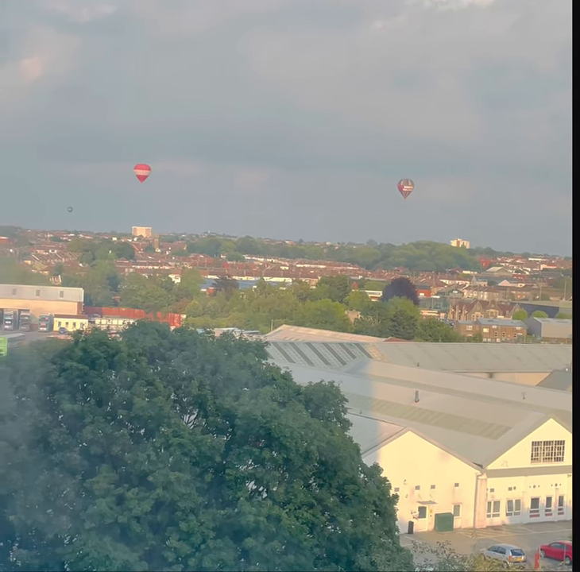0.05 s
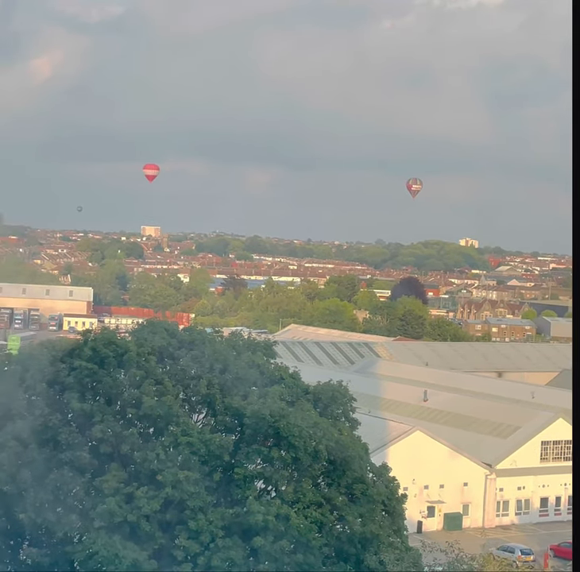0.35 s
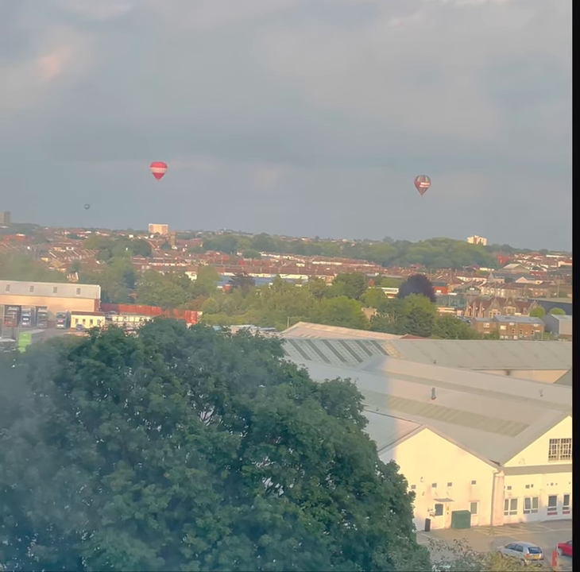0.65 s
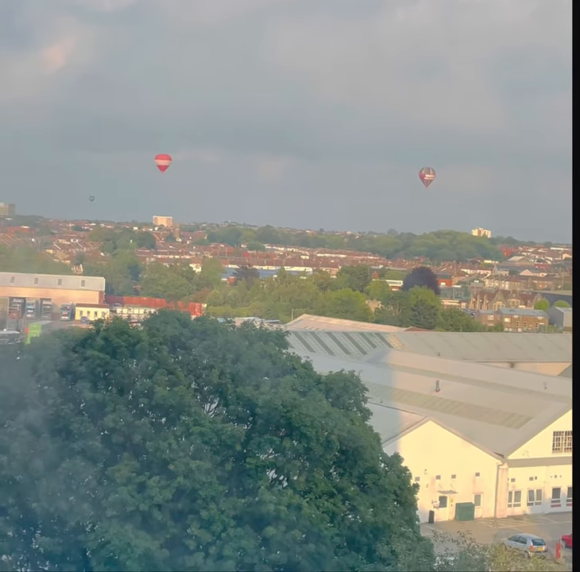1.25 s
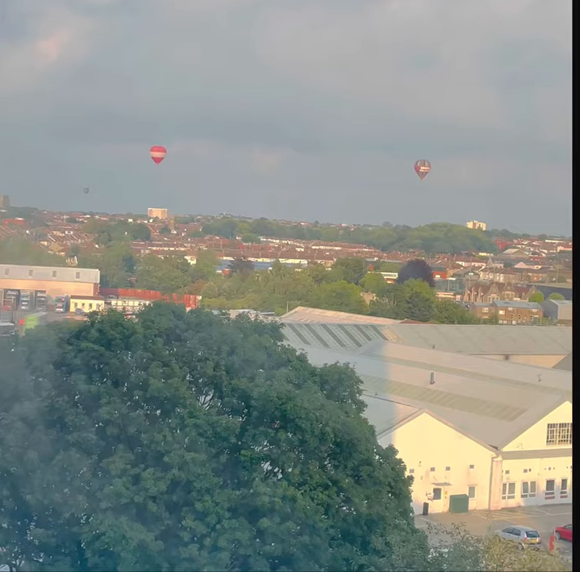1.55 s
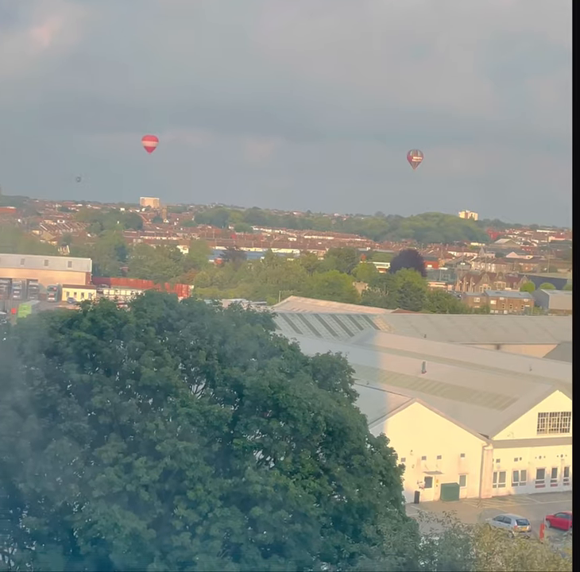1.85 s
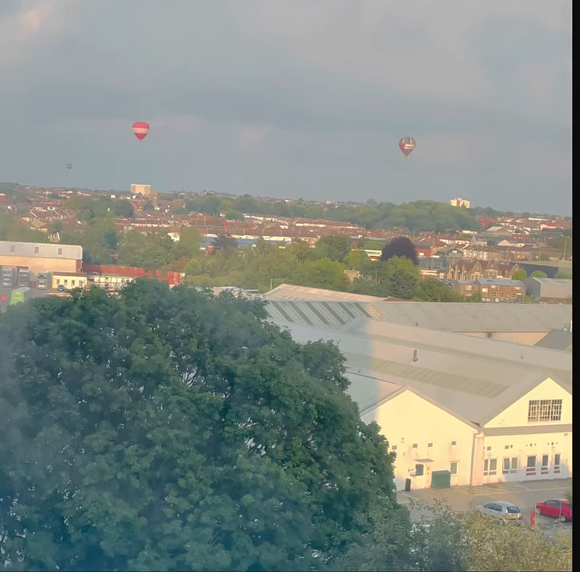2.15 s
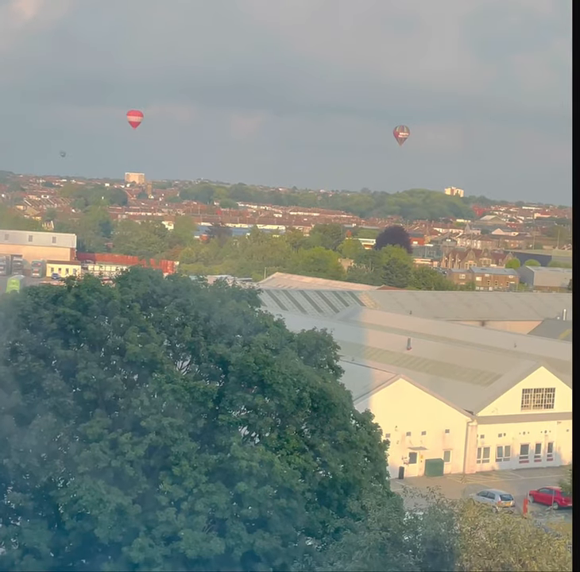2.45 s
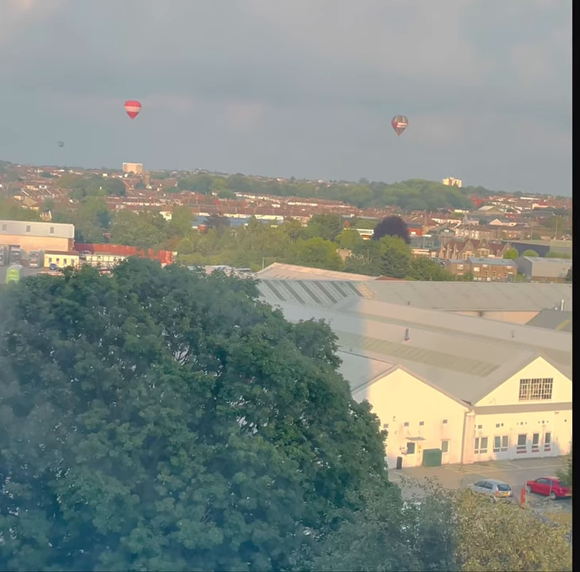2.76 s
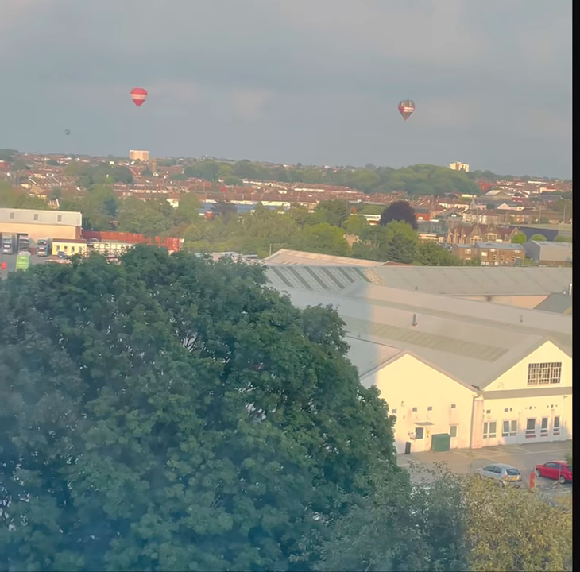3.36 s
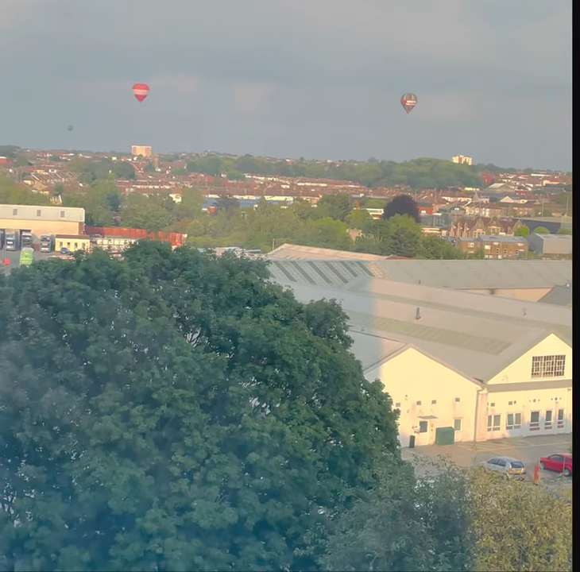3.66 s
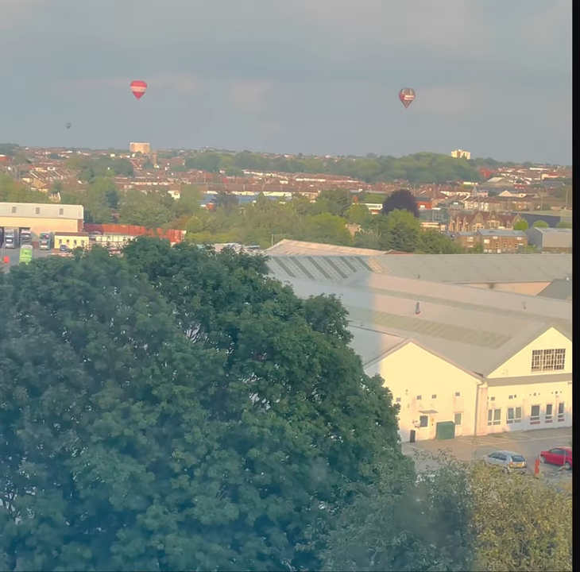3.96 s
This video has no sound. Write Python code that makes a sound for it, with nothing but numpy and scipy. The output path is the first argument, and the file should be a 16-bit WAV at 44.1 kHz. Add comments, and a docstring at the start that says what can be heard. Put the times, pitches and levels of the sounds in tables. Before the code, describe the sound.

Distant town traffic washes steadily throughout, over a deep, wavering rumble and faint engine drones. Soft, dull handling thuds and knocks hit the microphone often in the first 1.2 seconds, then only now and then. A far horn toots briefly at about 2.5 seconds, and a rougher toot follows near 3 seconds. Around 3.6 to 3.8 seconds a finger faintly brushes the microphone and ticks twice.

```python
"""Town from a high window

Far traffic washes steadily over a deep rumble and a few faint engine drones. A far horn toots, and a
brief, rougher toot follows near three seconds. A wall close by reflects the traffic, and a thin hiss
comes and goes. The hand that holds the microphone bumps it softly and knocks on its casing; near the
end a finger brushes it and ticks twice."""
import sys
import numpy as np
from scipy import signal
from scipy.fft import rfft, irfft
from scipy.io import wavfile

SR = 44100
rng = np.random.default_rng(int(sys.argv[2]) if len(sys.argv) > 2 else 0)


def wav_record(signal):
    """Record a signal, one row per channel, as 16-bit PCM in the file named by sys.argv[1]."""
    frames = np.transpose(np.atleast_2d(signal))
    bounded = np.clip(frames, -1, 1)
    # unit amplitude maps onto the largest positive 16-bit level
    quanta = np.round(bounded * 32767).astype(np.int16)
    wavfile.write(sys.argv[1], SR, quanta)


N = 176400
SIDES = np.array([[.5], [-.5]])   # splits a level or phase difference between left and right


def traffic():
    """Tyre and engine noise of many far streets, with one reflection from a wall close by."""
    # Spectra common to both channels and differing. Each row: frequency in Hz, relative level in dB.
    mid_spectrum = [(20, -35.5), (40, -10.5), (70, -0.5), (100, -7.5), (150, -8), (260, -13), (400, -18.5),
                    (520, -17), (700, -20), (850, -17), (1080, -18), (1280, -23.5), (1570, -26),
                    (1740, -27), (2250, -36.5), (2650, -36.5), (3200, -44), (4150, -47), (4550, -53.5),
                    (5300, -50.5), (6600, -61.5), (7600, -84.5), (9300, -66.5), (11500, -72), (15500, -94)]
    side_spectrum = [(20, -38.5), (62, -9.5), (105, -14), (170, -20), (300, -25.5), (650, -22.5),
                     (1100, -22), (1650, -34), (2050, -46.5), (2550, -38), (3300, -49), (4300, -51.5),
                     (5000, -65.5), (6600, -52), (8500, -59), (11000, -79), (15500, -77)]
    # The microphone's two ports hear the town out of step. Each row: frequency in Hz,
    # share of the differing part that is a phase lead of the left port, from -1 to 1.
    left_leads = [(250, -0.31), (560, 0.074), (900, -1), (1750, -0.37), (2350, 1), (4200, 0.58),
                  (6600, 0.6), (8800, -0.42), (12500, 0.18)]
    # Drift of the whole wash, and of its treble on top of that. Each row: time in seconds, gain in dB.
    flow = [(0, 0.5), (.35, 0.5), (.6, 0.45), (1.3, -0.27), (1.8, -1), (2.3, -0.2), (2.6, 0.5),
            (2.85, -0.5), (3.1, 0), (4, -0.5)]
    treble = [(0, 1.5), (.25, 5.5), (.48, 2), (.9, 1.3), (1.35, 1.5), (1.6, -2.5), (1.92, 2.5), (2.2, -1.5),
              (2.5, -7.5), (2.64, -1), (3.0, 0), (3.25, -2.5), (3.55, 2.5), (4, 1)]
    mid_db, side_db, pan_db = -45.5, -56, 0.3
    echo_s, echo_db = .0085, -19.5
    treble_hz, waver_db, waver_hz = 4150, 1, 11
    direct, diffuse = rfft(noise(1)), rfft(noise(1))
    lead = np.interp(bins(), *np.transpose(left_leads))
    differing = 1j * lead * direct + np.sqrt(1 - lead ** 2) * diffuse
    mid = from_db(mid_db) * shape(mid_spectrum) * direct
    side = from_db(side_db) * shape(side_spectrum) * differing
    wall = 1 + from_db(echo_db) * np.exp(-2j * np.pi * bins() * echo_s)
    wash = stereo(mid, side) * wall
    flow_db, treble_db = in_time(flow), in_time(treble)
    octave = np.clip(np.log2(bins() / 1000), -5, 4)
    out = 0
    for k in range(-5, 5):   # each octave wavers a little on its own
        treble_share = 1 / (1 + (treble_hz / (1000 * 2.0 ** k)) ** 2)
        gain = from_db(flow_db + treble_share * treble_db + waver_db * narrow(0, waver_hz))
        octave_band = np.maximum(1 - abs(octave - k), 0)
        out = out + gain * irfft(wash * octave_band, N)
    return out * from_db(pan_db * SIDES)


def rumble():
    """A deep, wavering rumble, alike in both channels."""
    # Its surges. Each row: time in seconds, level in dB.
    surges = [(0, -50), (.35, -50.5), (.58, -39.5), (.9, -50.5), (1.25, -52), (1.55, -45), (1.95, -49),
              (2.15, -42), (2.35, -52.5), (2.65, -50), (2.82, -42.5), (2.95, -43.5), (3.13, -37.5),
              (3.22, -54), (3.55, -45.5), (3.78, -46.5), (4, -48)]
    return from_db(in_time(surges)) * hum(hz=53.7, width_hz=6.8, unevenness=2.3).real


def drones_and_toot():
    """Far engines hum, swelling and fading; a brief, rough toot sounds near three seconds."""
    # Each row: pitch and width in Hz, level in dB, peak time and spread in seconds,
    # phase between the channels in radians. The last row is the toot.
    tones = [(233.5, 2.5, -56.5, 0.94, 0.44, 2.5), (505.5, 9.2, -58.5, 0.29, 0.41, 1.5),
             (1157, 10, -62, 0.088, 0.27, 0.5), (178.9, 5.7, -55.5, 3.14, 0.96, 0.78),
             (149.3, 12, -52, 0.35, .4, 1.5), (305.8, 14, -60.5, 1.8, 3, -0.76),
             (486.6, 17, -60.5, 3.64, 0.76, -0.8), (346.7, 10, -60.5, 1.06, 0.78, -0.5),
             (943, 10, -63.5, 2.2, 1.3, -0.9), (821, 19, -59.5, 1.29, 0.24, -1),
             (900, 97, -52.5, 3.06, 0.019, -1)]
    out = 0
    for hz, width_hz, db, peak_s, spread_s, phase in tones:
        tone = hum(hz, width_hz, unevenness=1) * np.exp(1j * phase * SIDES)
        out = out + tone.real * from_db(db) * swell(peak_s, spread_s)
    return out


def engine_and_horn():
    """Nearly pure tones stand out of the traffic: a far engine, then a short toot of a two-note horn."""
    # Each row: pitch in Hz, level in dB, peak time and spread in seconds,
    # pan to the left in dB, phase between the channels in radians.
    notes = [(233, -48, .17, .18, 4.5, 1.5), (845, -51.5, 2.455, .022, 0, 0), (938, -55.5, 2.47, .04, 0, 0)]
    out = 0
    for hz, db, peak_s, spread_s, pan_db, phase in notes:
        tone = hum(hz, width_hz=4.1, unevenness=.08) * np.exp(1j * phase * SIDES)
        out = out + tone.real * from_db(db + pan_db * SIDES) * swell(peak_s, spread_s)
    return out


def hand_bumps():
    """Each push of the hand on the microphone gives a dull thud of two or three cycles."""
    # Each row: start in seconds, peak level in dB, pitch in Hz.
    bumps = [(0.165, -32.5, 76), (0.181, -34, 76), (0.325, -35.5, 60), (0.439, -33.5, 79),
             (0.453, -32.5, 84), (0.504, -35, 65), (0.587, -37.5, 60.5), (0.624, -34, 68),
             (0.854, -40, 79.6), (0.983, -41, 88), (1.123, -29.5, 56.5), (1.157, -35.5, 55),
             (1.8423, -31.5, 76.4), (2.17, -34.5, 64), (3.029, -36.5, 83.5), (3.089, -39, 57.7),
             (3.746, -39, 60)]
    edge_ratio = 1.42
    out = np.zeros(N)
    for s, db, hz in bumps:
        push = -1.0 * (np.arange(N) == int(s * SR))
        thud = band(push, hz / edge_ratio, hz * edge_ratio)
        thud = band(thud, 12, 220)
        out += from_db(db) * thud / abs(thud).max()
    return out


def grip_knocks():
    """The grip shifts and knocks softly on the microphone's casing, which rings hollow."""
    # Each row: start in seconds, level in dB.
    knocks = [(.22, -45), (.442, -44.5), (.624, -43), (2.342, -44.5)]
    # The casing's low modes. Each row: pitch in Hz, level against the knock in dB, t60 in seconds.
    low_modes = [(178, -1, 0.073), (252, -5, 0.07), (303, -1, 0.086), (530, -15.5, 0.026), (660, -9, .03)]
    rise_s = 0.0027
    out = 0
    for s, db in knocks:
        age = since(s)
        ring = sum(from_db(mode_db) * dying(age, t60) * np.sin(2 * np.pi * hz * age)
                   for hz, mode_db, t60 in low_modes)
        out = out + from_db(db) * np.minimum(age / rise_s, 1) * ring
    return out


def finger():
    """A faint brush of skin on the microphone's casing, and two dry ticks that ring it briefly."""
    # The stroke. Each row: time in seconds, level in dB.
    stroke = [(3.4, -105), (3.55, -92), (3.625, -89), (3.65, -81), (3.71, -86), (3.75, -98)]
    # Rubbing skin. Each row: frequency in Hz, relative level in dB.
    skin = [(2000, -13.5), (5000, -0.5), (7500, -9.5), (11000, 4), (15500, -1.5)]
    # Each row: start in seconds, level in dB, t60 in seconds, low edge in Hz,
    # tail and casing levels against the tick in dB.
    ticks = [(3.6327, -58, 0.0074, 10100, -30, -13), (3.8077, -61, 0.017, 8550, -14, 0)]
    # The casing's high modes. Each row: pitch and width in Hz, relative level in dB, t60 in seconds.
    high_modes = [(4330, 210, 1, 0.028), (5700, 220, -5, 0.022), (3200, 300, -5, 0.022)]
    stereo_width, rise_s, tail_t60_s, top_hz = 0.84, 0.0017, 0.19, 13100
    out = from_db(in_time(stroke)) * stereo(coloured(skin), stereo_width * coloured(skin))
    for s, db, snap_t60_s, low_hz, tail_db, casing_db in ticks:
        age = since(s)
        mid, side = rms_one(band(rng.standard_normal((2, N)), low_hz, top_hz))
        decay = dying(age, snap_t60_s) + from_db(tail_db) * dying(age, tail_t60_s)
        snap = decay * stereo(mid, stereo_width * side)
        ring = sum(from_db(casing_db + mode_db) * dying(age, t60) * narrow(hz, width_hz)
                   for hz, width_hz, mode_db, t60 in high_modes)
        out = out + from_db(db) * np.minimum(age / rise_s, 1) * (snap + ring)
    return out


def hiss():
    """A faint, thin hiss comes and goes, spread wide between left and right."""
    # Each row: peak time and spread in seconds, level in dB.
    swells = [(.14, 0.16, -80.5), (.9, 0.17, -91.5), (2.65, 0.04, -81.5), (2.83, 0.066, -88),
              (3.64, 0.054, -85)]
    level = sum(from_db(db) * swell(s, spread_s) for s, spread_s, db in swells)
    return level * np.array([narrow(hz=6480, width_hz=170) for _ in range(2)])


def from_db(db):
    """Decibels to gain."""
    return 10 ** (np.asarray(db) / 20)


def rms_one(x):
    """Scale to unit power."""
    return x / np.sqrt(np.mean(x ** 2) + 1e-20)


def in_time(rows):
    """A curve of times and values, sample by sample."""
    return np.interp(np.arange(N) / SR, *np.transpose(rows))


def since(start_s):
    """Seconds since a start, zero before it."""
    return np.maximum(np.arange(N) / SR - start_s, 0)


def swell(peak_s, spread_s):
    """A smooth rise and fall."""
    return np.exp(-.5 * ((np.arange(N) / SR - peak_s) / spread_s) ** 2)


def dying(age, t60):
    """Exponential decay, 60 dB down after t60 seconds."""
    return np.exp(-np.log(1000) * age / t60)


def bins():
    """Frequencies of the spectrum's bins in Hz."""
    return np.maximum(np.arange(N // 2 + 1) * SR / N, 1)


def shape(points):
    """Unit-power gains in each bin that follow a spectrum, rolled off below 20 Hz."""
    hz, db = np.transpose(points)
    gain = from_db(np.interp(np.log(bins()), np.log(hz), db))
    return rms_one(gain * np.minimum(bins() / 20, 1) ** 2)


def noise(gain):
    """Unit noise with the given relative gain in each bin."""
    return rms_one(irfft(gain * np.exp(2j * np.pi * rng.random(N // 2 + 1)), N))


def coloured(points):
    """Unit noise that follows a spectrum."""
    return noise(shape(points))


def narrow(hz, width_hz):
    """Unit noise in one steep-sided resonance."""
    return noise(1 / (1 + ((bins() - hz) / width_hz) ** 2))


def hum(hz, width_hz, unevenness):
    """A wavering tone (complex): narrow noise with its level partly evened out."""
    wave = signal.hilbert(narrow(hz, width_hz))
    wave = wave / np.sqrt(abs(wave) ** 2 + unevenness)
    return wave / wave.real.std()


def band(x, low_hz, high_hz):
    """Causal band-pass."""
    return signal.sosfilt(signal.butter(2, [low_hz, high_hz], "band", fs=SR, output="sos"), x + 1e-18)


def stereo(mid, side):
    """Left and right from their common and differing parts."""
    return np.array([mid + side, mid - side])


def scene():
    """The town outside and the hand on the microphone."""
    ambience = traffic() + rumble() + drones_and_toot() + engine_and_horn() + hiss()
    return ambience + hand_bumps() + grip_knocks() + finger()


def record(dry):
    """The recorder cuts the top steeply."""
    cutoff_hz = 15800
    return signal.sosfilt(signal.ellip(10, .1, 80, cutoff_hz, fs=SR, output="sos"), dry)


dry = scene()
out = record(dry)
wav_record(out)
```